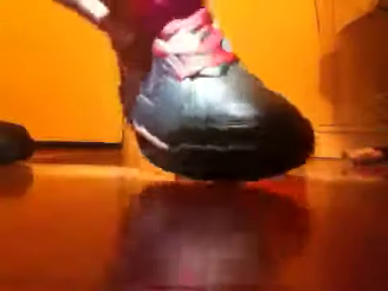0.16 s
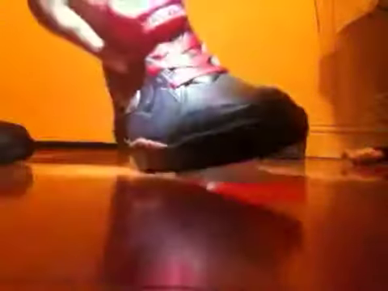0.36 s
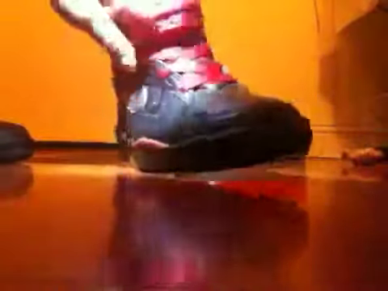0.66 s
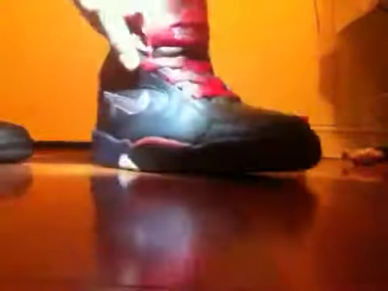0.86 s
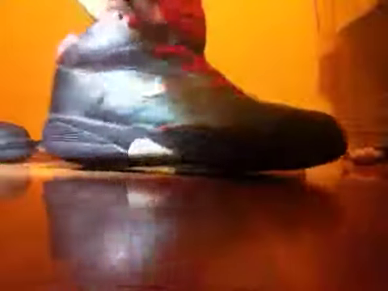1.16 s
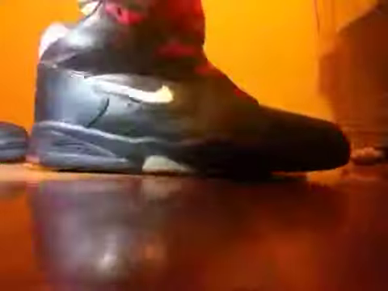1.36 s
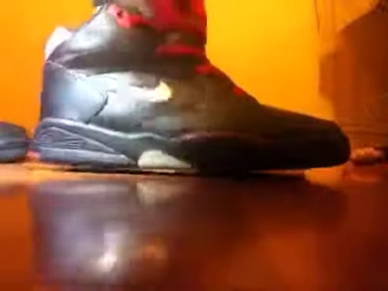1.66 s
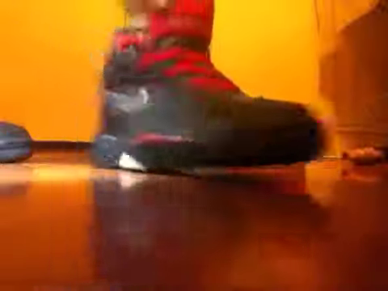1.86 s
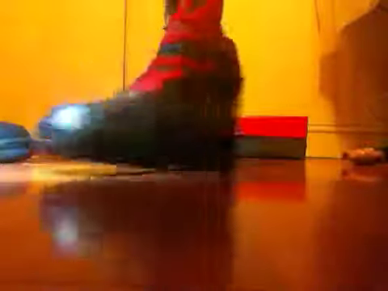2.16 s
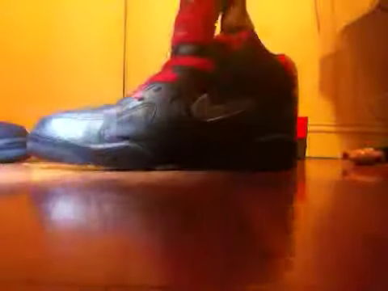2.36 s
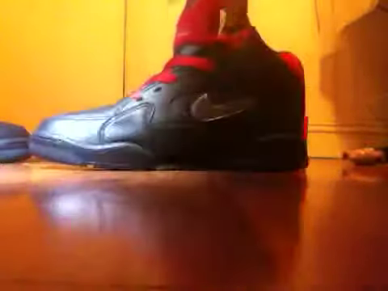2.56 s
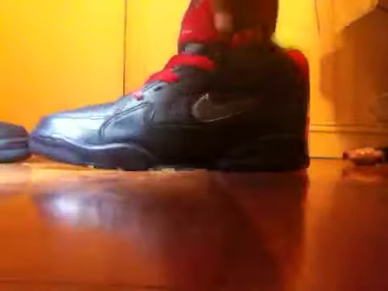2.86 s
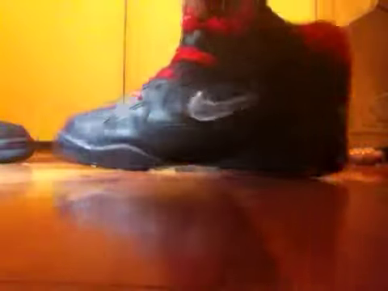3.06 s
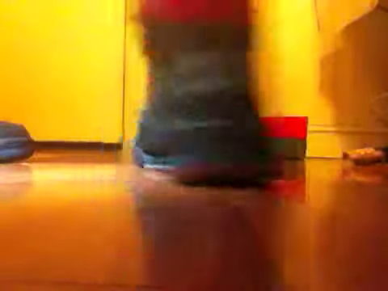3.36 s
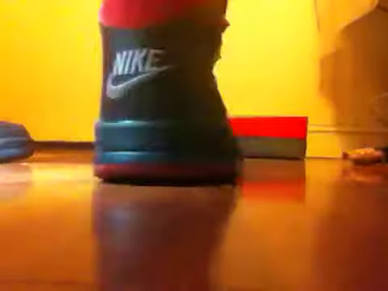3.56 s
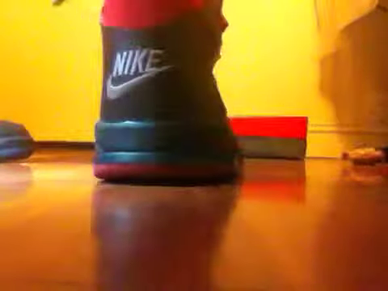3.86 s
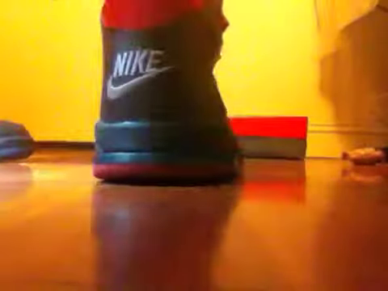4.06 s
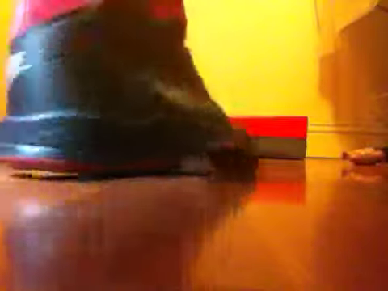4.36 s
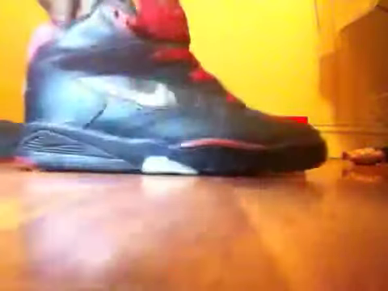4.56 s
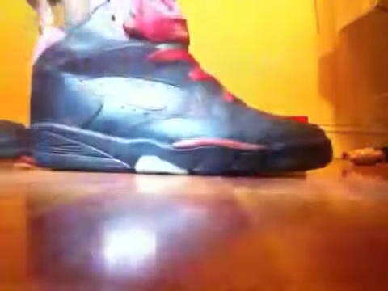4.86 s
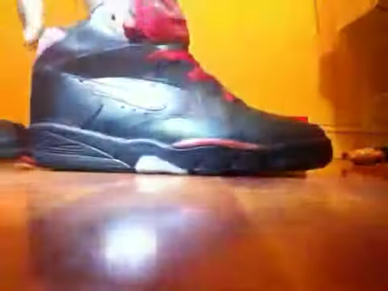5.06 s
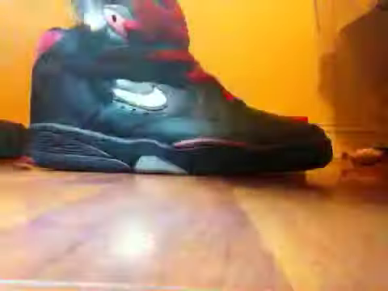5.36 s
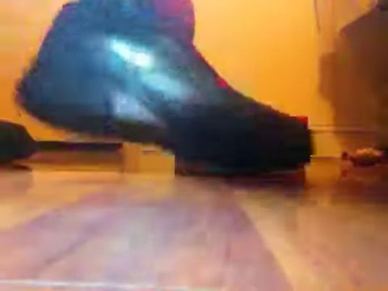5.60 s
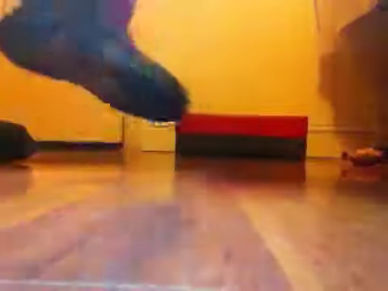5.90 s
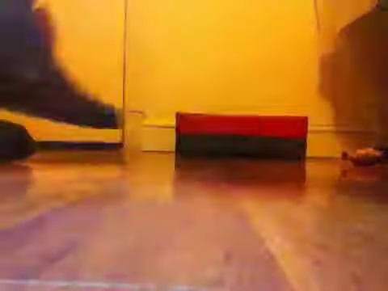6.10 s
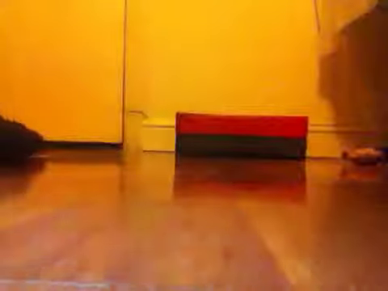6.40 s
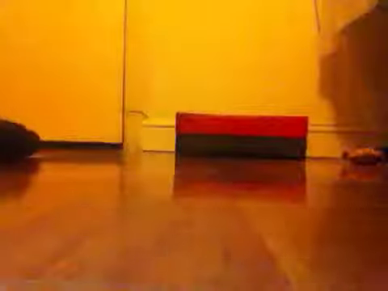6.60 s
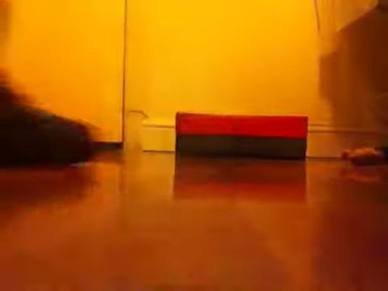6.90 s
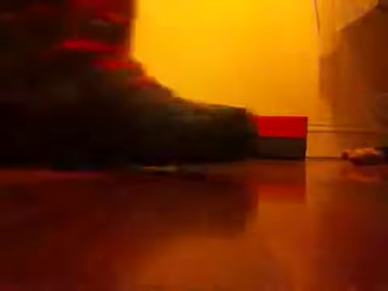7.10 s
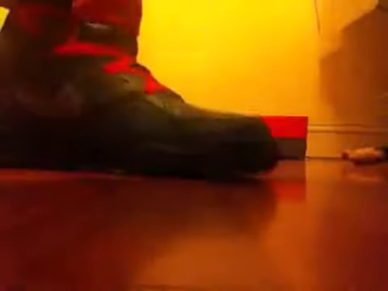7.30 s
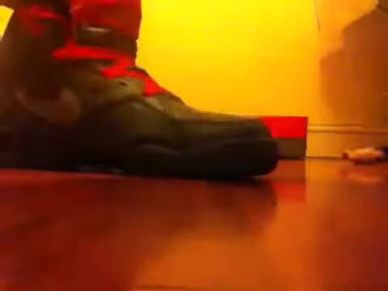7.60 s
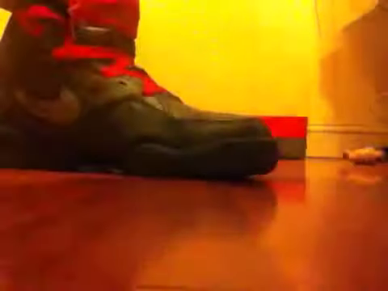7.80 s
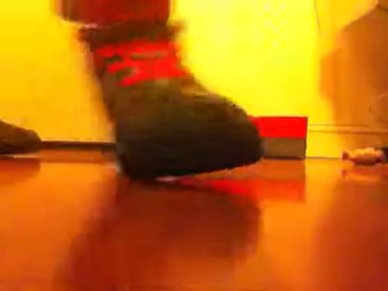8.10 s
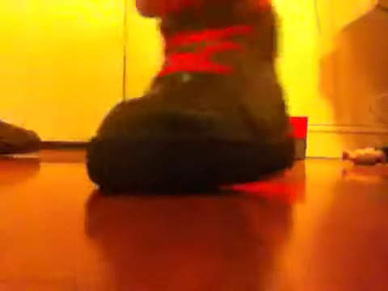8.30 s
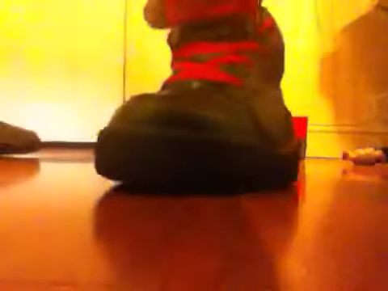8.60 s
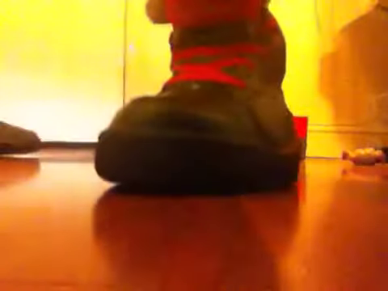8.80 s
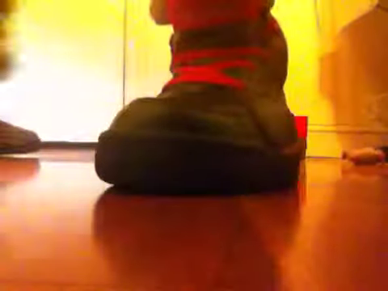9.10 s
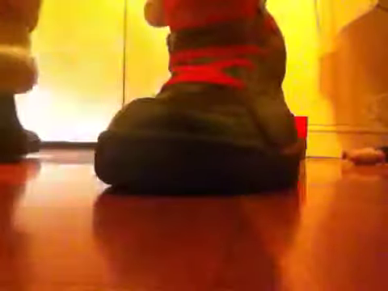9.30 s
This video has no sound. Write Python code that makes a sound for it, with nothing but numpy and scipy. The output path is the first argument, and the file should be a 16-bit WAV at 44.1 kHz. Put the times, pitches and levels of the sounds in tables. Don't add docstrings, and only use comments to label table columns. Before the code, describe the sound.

Close to a small microphone in a hard little room, rubber soles thump and knock softly on hardwood, with faint fizzing scuffs and cloth rustle. After a few placements, a shoe drops with sharp cracks and a bounce, skidding to rest. Another steps in, shuffles and settles. Faint hiss and distant clock ticks lie beneath.

```python
import sys
import numpy as np
from scipy import signal
from scipy.fft import rfft, irfft, next_fast_len
from scipy.io import wavfile
from scipy.ndimage import uniform_filter1d

SR = 44100
rng = np.random.default_rng(int(sys.argv[2]) if len(sys.argv) > 2 else 0)


def wrap_up_sound(samples):
    columns = np.atleast_2d(samples).T
    tamed = np.clip(columns, -1, 1)
    steps = np.round(tamed * 32767).astype(np.int16)
    wavfile.write(sys.argv[1], SR, steps)


def voltage_ratio(decibels):
    exponent = np.asarray(decibels, float) / 20
    return 10 ** exponent


N = 416744


def unit(x):
    return x / np.sqrt(np.mean(x ** 2) + 1e-20)


def along(points, hz):
    f, v = np.transpose(points)
    return np.interp(np.log(hz + 1), np.log(f + 1), v)


def coloured(x, gain):
    m = next_fast_len(len(x) + 8192)
    spectrum = rfft(x, m) * gain(np.fft.rfftfreq(m, 1 / SR))
    return unit(irfft(spectrum, m)[:len(x)])


def shaped(x, curve):
    return coloured(x, lambda hz: voltage_ratio(along(curve, hz)))


def band(x, lo_hz, hi_hz):
    sos = signal.butter(3, [lo_hz, min(hi_hz, .45 * SR)], "bandpass", fs=SR, output="sos")
    y = signal.sosfilt(sos, x)
    return y / np.abs(y).max()


def snap(t, lo_hz, hi_hz, t60, rough):
    blow = rough * rng.standard_normal(len(t)) * voltage_ratio(-60 * t / t60)
    blow[0] = -1
    return band(blow, lo_hz, hi_hz)


def ring(modes, t, attack, spread_db):
    tones = np.zeros(len(t))
    for hz, db, t60 in modes:
        strength_db = db + rng.normal(0, spread_db)
        tones += voltage_ratio(strength_db - 60 * t / t60) * np.sin(2 * np.pi * hz * t)
    return tones * (1 - np.exp(-t / attack))


def grit(per_second, spread_db, smooth):
    caught = rng.random(N) < per_second / SR
    catches = caught * voltage_ratio(spread_db * rng.standard_normal(N)) * rng.standard_normal(N)
    return unit(catches) + smooth * rng.standard_normal(N)


def patchy(x, depth_db):
    z = signal.stft(x, nperseg=256)[2]
    field = uniform_filter1d(rng.standard_normal(z.shape), size=6, axis=0)
    field = uniform_filter1d(field, size=14, axis=1)
    return signal.istft(z * voltage_ratio(depth_db * unit(field)), nperseg=256)[1][:N]


def swells(rows):
    t, out = np.arange(N) / SR, np.zeros(N)
    for s, rise, fall, db in rows:
        near = slice(max(0, round((s - 2 * rise) * SR)), round((s + 2 * fall) * SR))
        away = np.maximum((s - t[near]) / rise, (t[near] - s) / fall)
        out[near] += voltage_ratio(db - 20 * away) ** 2
    return out


def add(track, s, x):
    part = track[round(s * SR):][:len(x)]
    part += x[:len(part)]


# (frequency [Hz], t60 [s])
ROOM_DECAY = [(100, 0.61), (260, 0.44), (700, 0.45), (1800, 0.37), (5000, 0.35), (12000, 0.2)]


def room(x):
    hz, t, z = signal.stft(rng.standard_normal(SR * 3 // 4), SR, nperseg=256)
    decay = voltage_ratio(-60 * t / along(ROOM_DECAY, hz)[:, None])
    tail = signal.istft(z * decay, SR, nperseg=256)[1]
    tail *= 1 - np.exp(-np.arange(len(tail)) / SR / 0.0005)
    return signal.fftconvolve(x, tail / np.linalg.norm(tail))


# (frequency [Hz], level [dB])
HISS_COLOUR = [(25, -16), (55, -33), (180, -14), (428, -5.5), (1370, -12), (2390, -13.5), (9510, -16.5),
               (14700, -18)]
# (frequency [Hz], rms level [dB], width [Hz])
APPLIANCE_TONES = [(789, -83.5, 2.7), (736, -81.5, 4.4), (9380, -86, 58)]
# (frequency [Hz], rms level [dB])
WHINE_TONE = (15000, -79.5)


def background():
    out = voltage_ratio(-67) * shaped(rng.standard_normal(N), HISS_COLOUR)
    for centre, db, width in APPLIANCE_TONES:
        hum = coloured(rng.standard_normal(N), lambda hz: 1 / (1 + ((hz - centre) / width) ** 2))
        out = out + voltage_ratio(db) * hum
    whine_hz, whine_db = WHINE_TONE
    return out + voltage_ratio(whine_db) * np.sqrt(2) * np.sin(2 * np.pi * whine_hz * np.arange(N) / SR)


# (frequency [Hz], level [dB], t60 [s])
PENDULUM_MODES = [(1085, 0, .3), (1340, -9, .2), (2250, -10, .15)]
# (frequency [Hz], level [dB], t60 [s])
WALL_CLOCK_MODES = [(790, -31, 0.021), (831, -2, 0.11), (986, 7, 0.034), (980, -2, 0.033)]


def clocks():
    out, t = np.zeros(N), np.arange(SR // 4) / SR
    for swing in range(16):
        start = swing * .5972
        add(out, .012 + start, voltage_ratio(-64) * ring(PENDULUM_MODES[:1], t, attack=.008, spread_db=2))
        add(out, .286 + start, voltage_ratio(-65) * ring(PENDULUM_MODES, t, attack=.008, spread_db=2))
    beating = unit(uniform_filter1d(rng.standard_normal(N), size=500))
    out *= voltage_ratio(2.5 * beating)
    for second in range(9):
        tick = ring(WALL_CLOCK_MODES, t, attack=0.0019, spread_db=0)
        add(out, .615 + second, voltage_ratio(-78.5) * unit(room(tick)))
    return out


# (time [s], crack
# peak [dB], body level [dB], edge level [dB], room level [dB])
BRIGHT_TICKS = [(0.0812, -62, -49, -69, -3), (0.8784, -64, -44.5, -61, 1), (0.8993, -42, -45, -72, -8),
                (1.089, -53, -44, -40, 0), (1.8667, -57, -41, -68, -5.5), (1.103, -52, -54, -46, -11),
                (1.112, -56, -51, -58, -9), (2.3154, -51, -50, -67, -13), (2.4159, -56, -59, -64, -7),
                (3.4785, -45, -48, -36.5, -5), (5.5469, -44, -49, -65, -13), (5.594, -49, -68, -65, -13),
                (5.6342, -53, -52, -74, -12), (5.6474, -47, -44, -68, -16), (6.1753, -19.5, -25, -13, -13),
                (6.348, -26, -34, -62, -7), (6.5256, -19.5, -24, -37, -5), (6.9359, -39, -61, -65, -6),
                (7.1965, -40, -35, -46, -5), (8.047, -42.5, -41.5, -51, 0), (8.3403, -50, -49, -57, -6),
                (8.7962, -54, -40, -62, -20)]


def ticks():
    out, t = np.zeros(N), np.arange(SR // 30) / SR
    for s, db, body_db, edge_db, room_db in BRIGHT_TICKS:
        crack = voltage_ratio(db) * snap(t, lo_hz=2370, hi_hz=3800, t60=0.037, rough=0.03)
        body = voltage_ratio(body_db) * snap(t, lo_hz=880, hi_hz=2460, t60=0.0067, rough=0.22)
        edge = voltage_ratio(edge_db) * snap(t, lo_hz=5100, hi_hz=12600, t60=0.0095, rough=0.081)
        dry = crack + body + edge
        add(out, s, dry)
        add(out, s + .003, voltage_ratio(room_db) * room(dry))
    return out


# (peak time [s], rise [s], fall [s], cloth level [dB], board groan over cloth [dB])
GRIP_SHIFTS = [(0.01, .1, 0.33, -71.5, -7), (0.33, 0.19, 1, -71, 2), (0.96, 0.11, .2, -67, -5),
               (1.096, 0.17, 0.9, -68, -3), (1.4, 0.32, 1, -71, -4), (1.63, 0.11, 0.18, -62.5, -9),
               (2.0, 0.57, 0.64, -70.5, 2.5), (2.326, 0.4, 0.057, -70.5, 11), (2.422, 0.069, 0.17, -66, 6),
               (3.038, 0.3, 0.23, -63.5, -3), (3.25, 0.65, .4, -63.5, -4), (3.62, .1, .12, -59, -16),
               (4.28, 0.7, .9, -70, 1), (5.14, 0.25, 0.99, -67.5, -3.5), (5.61, 0.024, 0.25, -62.5, 2),
               (6.09, 0.34, .15, -68, -11), (6.4, .3, .15, -58, 6), (6.87, .04, 0.018, -68, 15)]
# (peak time [s], rise [s], fall [s], cloth level [dB], board groan over cloth [dB])
FOOT_LEANS = [
    (7.0, 0.15, .08, -55, -5),
    (7.56, 0.9, 1, -68.5, -8),
    (8.39, 1, 0.023, -70, -2),
    (8.68, .9, 0.04, -69, -10),
    (8.83, 0.18, 0.15, -64, -4),
    (9.1, 0.47, 0.28, -69, -16),
    (7.63, 0.07, 0.093, -60, -18),
]
# (peak time [s], rise [s], fall [s], scuff level [dB], fizz over scuff [dB])
SOLE_DRAGS = [(1.096, 0.096, 0.076, -62, -3), (1.36, .3, .3, -71, -8), (1.63, 0.034, .4, -75, -8),
              (1.92, 0.21, .5, -74, 0.5), (2.32, .3, .12, -67, -11), (2.43, .12, .12, -63, -5),
              (2.9, 0.058, 0.55, -71, -7), (3.25, 0.43, 0.53, -70.5, -2), (3.44, .1, 0.26, -79, 6),
              (4.28, 0.17, 0.42, -70, -2.5), (4.59, 0.18, 0.24, -67, -4), (5.14, 0.16, 0.21, -69.5, 2.5),
              (5.62, .1, .4, -80, 3), (6.03, 0.69, .03, -75, 2), (6.09, 0.048, .15, -68, 1.5)]
# (peak time [s], rise [s], fall [s], scuff level [dB], fizz over scuff [dB])
SHOE_SKIDS = [
    (6.184, 0.019, 0.017, -46.5, -6),
    (6.2, .01, 0.19, -61, -2),
    (6.36, .02, 0.24, -61, -22),
    (6.445, .05, 0.17, -62, -9),
    (6.543, 0.025, .14, -41.5, -12),
    (6.87, 0.066, .025, -65, -9),
    (7.115, .015, .2, -55, -9),
    (7.17, .2, .08, -56, -3),
]
# (peak time [s], rise [s], fall [s], scuff level [dB], fizz over scuff [dB])
SHOE_SHUFFLE = [(6.945, .015, .12, -63.5, -8), (7.21, .04, 0.054, -50, -3),
                (7.505, 0.059, 0.071, -59.5, -5), (7.6, 0.33, 0.14, -68.5, -5),
                (7.74, 0.37, 0.19, -72.5, 4), (7.912, 0.083, .12, -74, 1.5), (8.048, .05, .06, -53.5, -5),
                (8.08, 0.094, 0.14, -64.5, -2.5), (8.968, 0.094, 0.37, -67, -0.5),
                (9.222, 0.21, 0.12, -67.5, -4), (9.44, 0.11, .1, -70, -5)]
# (fizz [dB], scuff [dB], cloth [dB], groan [dB])
FIDGET_DB = (-87, -76, -74, -73.5)


def efforts():
    drags = SOLE_DRAGS + SHOE_SKIDS + SHOE_SHUFFLE
    shifts = GRIP_SHIFTS + FOOT_LEANS
    scuff = swells([row[:4] for row in drags])
    fizz = swells([(s, rise, fall, db + bright) for s, rise, fall, db, bright in drags])
    cloth = swells([row[:4] for row in shifts])
    groan = swells([(s, rise, fall, db + load) for s, rise, fall, db, load in shifts])
    thumps = SHOE_SET_DOWN + SHOE_STEPS + SHOE_DROP
    settle = swells([(s + 0.0078, .02, .18, thump_db - 15) for s, _, thump_db, *_ in thumps])
    cloth = cloth + voltage_ratio(2 * -5.5) * scuff
    groan = groan + voltage_ratio(2 * -4.5) * scuff + settle
    return [np.sqrt(power + voltage_ratio(2 * db)) for power, db in zip([fizz, scuff, cloth, groan], FIDGET_DB)]


# (frequency [Hz], level [dB])
FIZZ_COLOUR = [(3000, -26), (4800, 1), (6000, -0.5), (8000, -1), (11000, -6), (13500, -8), (16000, -20)]
# (frequency [Hz], level [dB])
SCUFF_COLOUR = [(1200, -28), (1800, 4.5), (2300, 5.5), (2800, 3.5), (3500, 3), (4500, -8.5), (7000, -16.5)]
# (frequency [Hz], level [dB])
CLOTH_COLOUR = [(110, -54), (300, -2), (500, 4.5), (900, -0.5), (1500, -2), (2200, -13.5), (4000, -25.5)]
# (frequency [Hz], level [dB])
GROAN_COLOUR = [(45, -40), (75, -22), (120, -5), (200, 1.5), (420, -2.5), (700, -45)]


def friction():
    fizzing, scuffing, rustling, groaning = efforts()
    sole = patchy(grit(per_second=3000, spread_db=4, smooth=1.5), depth_db=2.5)
    fizz = shaped(sole, FIZZ_COLOUR)
    scuff = shaped(sole, SCUFF_COLOUR)
    cloth = shaped(grit(per_second=700, spread_db=1.5, smooth=2), CLOTH_COLOUR)
    groan = shaped(grit(per_second=55, spread_db=3.5, smooth=2.8), GROAN_COLOUR)
    return fizzing * fizz + scuffing * scuff + rustling * cloth + voltage_ratio(-3) * groaning * groan


# (frequency [Hz], level [dB], t60 [s])
BOARD_MODES = [(150.8, -6.5, 0.078), (233, -7.5, 0.073), (299, -6, 0.049), (430.5, -14, 0.14),
               (612, -24, 0.24), (720, -10.5, 0.049), (794, -9.5, 0.051), (964, -17.5, 0.036)]
# (time [s], knock peak [dB], thump level [dB], thump frequency [Hz], room level [dB])
SHOE_SET_DOWN = [(0.109, -44, -35, 256, -16.5), (0.363, -58, -51.5, 315, -10), (0.877, -44, -33.5, 345, -7),
                 (0.9, -32, -35, 194, -10.5), (0.92, -45, -45, 172, -7), (1.478, -49, -58, 180, -6),
                 (1.867, -44, -40.5, 202, -5), (2.276, -61, -49, 290, -15), (2.299, -65, -52, 195, -2),
                 (2.336, -59, -51.5, 207, -13), (2.356, -65, -54, 172, -10), (2.471, -56, -54.5, 194, -11),
                 (2.494, -60, -52, 198, -14), (2.515, -62, -60, 180, 1.5), (3.316, -46, -41, 189, -7.5),
                 (3.476, -24, -29.5, 198, -14), (4.229, -59, -52.5, 210, -11), (4.301, -55, -55, 173, -12),
                 (4.563, -58, -52.5, 199, -4.5)]
# (time [s], knock peak [dB], thump level [dB], thump frequency [Hz], room level [dB])
SHOE_DROP = [(5.547, -58, -60, 253, -18), (5.605, -56, -75, 288, -10), (5.634, -41, -59, 312, -5),
             (6.33, -27.5, -39.5, 415, -9), (6.347, -32, -30.5, 383, -3), (6.351, -55, -37, 190, -4),
             (6.427, -37, -43.5, 377, -15), (6.521, -28, -29, 305, 1), (6.526, -19, -25, 198, -7),
             (6.5265, -21, -25, 435, 2), (6.611, -45, -35, 410, 1)]
# (time [s], knock peak [dB], thump level [dB], thump frequency [Hz], room level [dB])
SHOE_STEPS = [
    (6.856, -60, -51.5, 400, -21),
    (6.936, -38, -36, 179, -9),
    (7.101, -38.5, -36.5, 192, -3.5),
    (7.33, -47.5, -49, 200, -9.5),
    (8.341, -64, -64, 260, -12),
    (8.446, -60, -61.5, 211, -8),
    (8.638, -64, -59, 182, -11),
    (8.794, -34, -54, 308, -15),
    (8.955, -64, -66, 139, -7),
    (9.401, -47, -43, 205, -22),
]


def contacts():
    out, t = np.zeros(N), np.arange(SR // 6) / SR
    hits = [(*row, -18) for row in SHOE_SET_DOWN + SHOE_STEPS]
    hits += [(*row, -9) for row in SHOE_DROP]
    lag_s, thump_cycles = .0015, 8.7
    for s, knock_db, db, hz, room_db, slap_db in hits:
        turns = hz * t + 0.34 * (1 - np.exp(-t / 0.00056))
        push = -np.sin(2 * np.pi * turns) * voltage_ratio(-60 * t * hz / thump_cycles) * (1 - np.exp(-t / 0.00039))
        boards = ring(BOARD_MODES, t, attack=0.0038, spread_db=6.0)
        thump = voltage_ratio(db + 10.5) * (push + voltage_ratio(-9.5) * boards)
        knock = voltage_ratio(knock_db - 3.5) * snap(t, lo_hz=417, hi_hz=1390, t60=0.029, rough=0.2)
        slap = voltage_ratio(knock_db + slap_db) * snap(t, lo_hz=1520, hi_hz=3640, t60=0.028, rough=0.23)
        dry = thump + knock + slap
        add(out, s + lag_s, dry)
        add(out, s + lag_s + .003, voltage_ratio(room_db) * room(dry))
    return out


def scene():
    return (clocks() + ticks() + friction() + contacts())[None]


def low_pass(x):
    return signal.sosfilt(signal.butter(12, 16830, fs=SR, output="sos"), x)


def record(dry):
    thin = signal.sosfilt(signal.butter(3, 85, "highpass", fs=SR, output="sos"), dry)
    mix = thin + background() - 1e-4
    mix = irfft(rfft(mix) * (np.fft.rfftfreq(N, 1 / SR) < 15780), N)
    return low_pass(mix)


dry = scene()
out = record(dry)
wrap_up_sound(out)
```